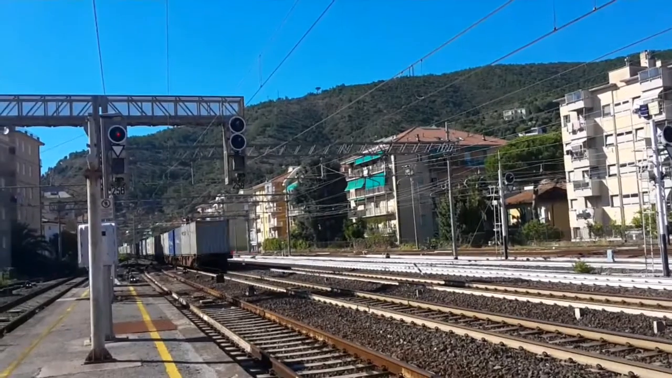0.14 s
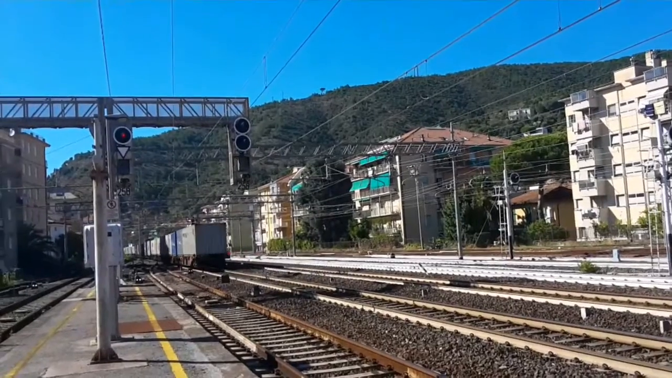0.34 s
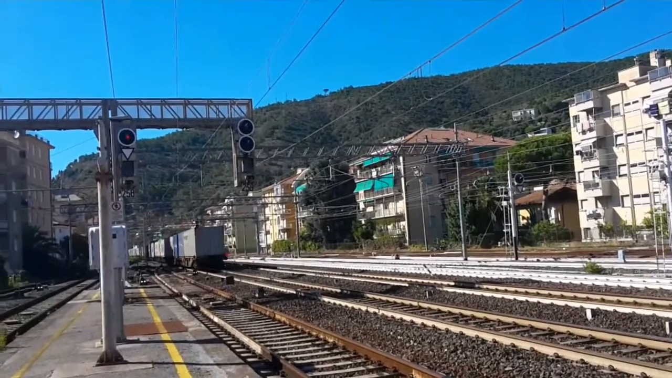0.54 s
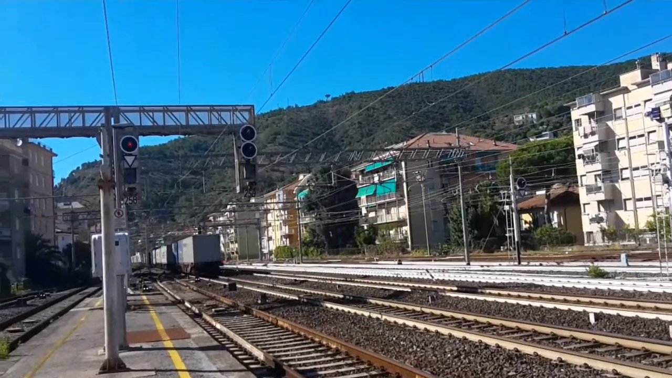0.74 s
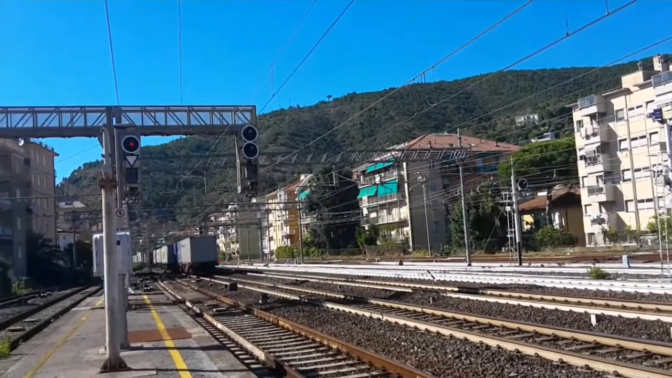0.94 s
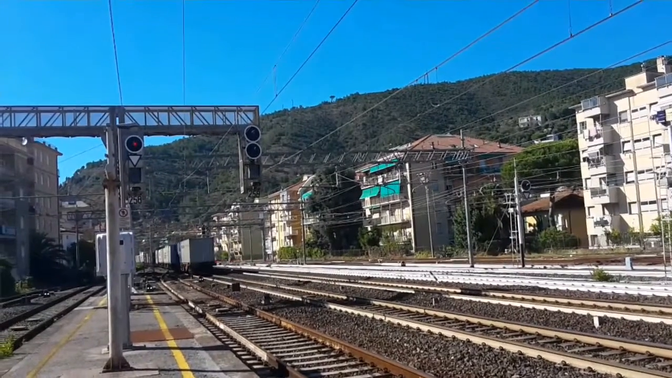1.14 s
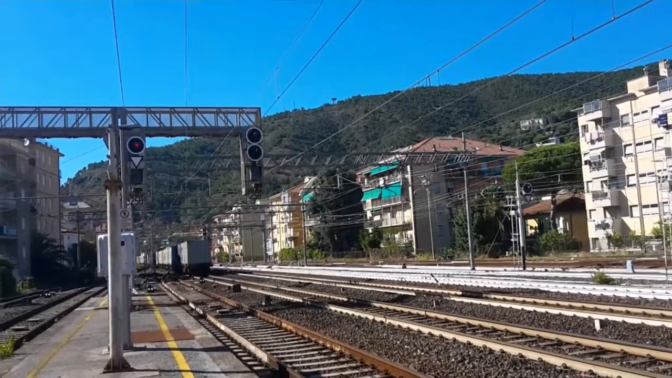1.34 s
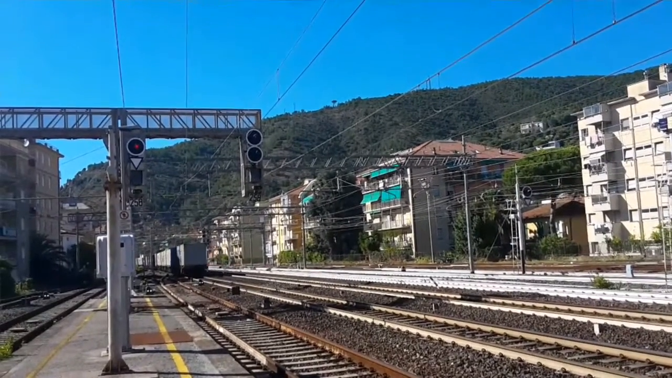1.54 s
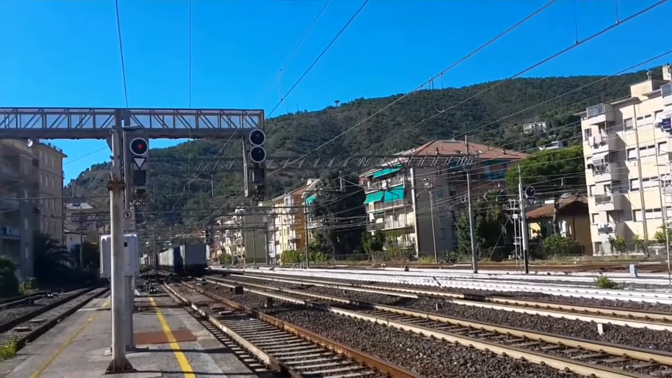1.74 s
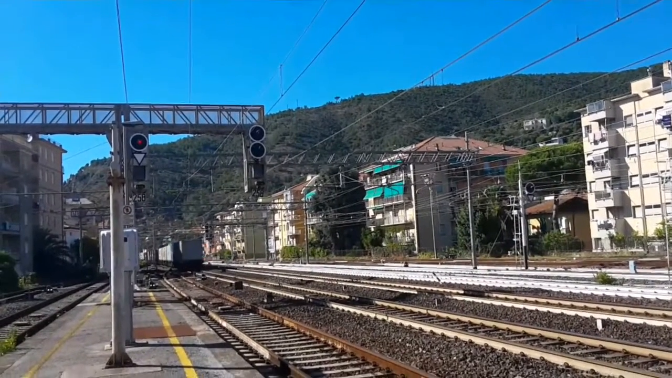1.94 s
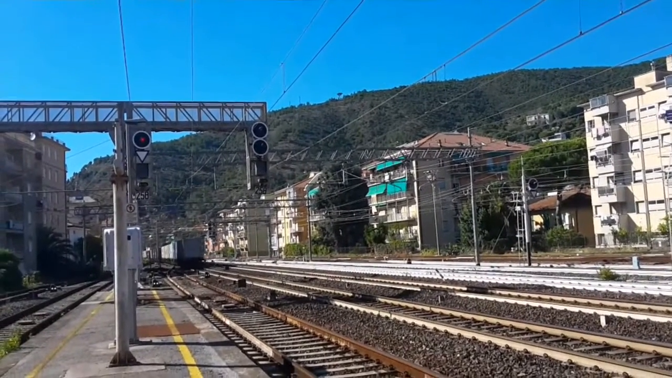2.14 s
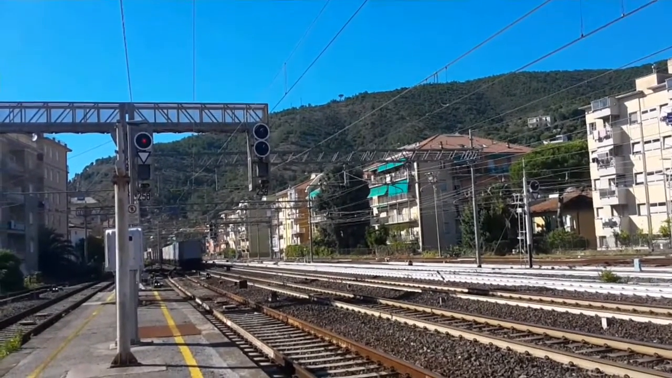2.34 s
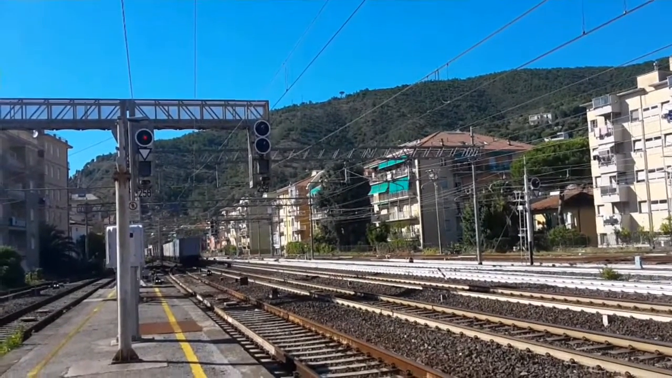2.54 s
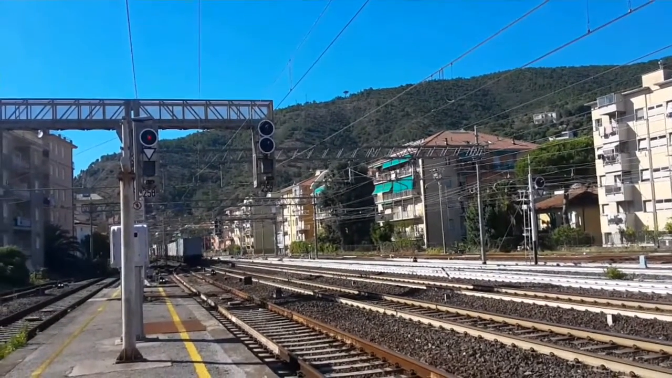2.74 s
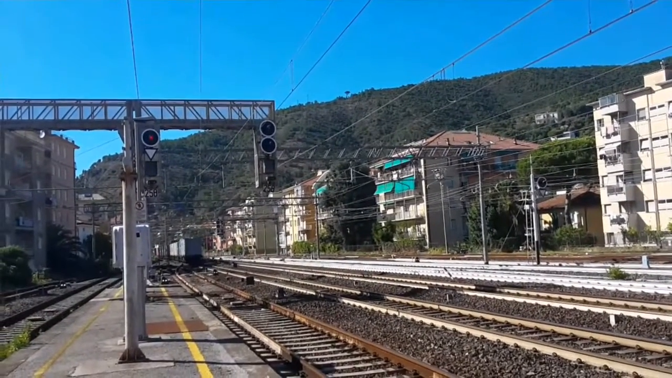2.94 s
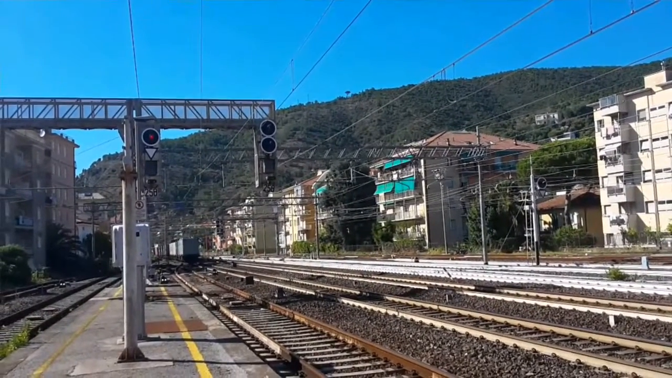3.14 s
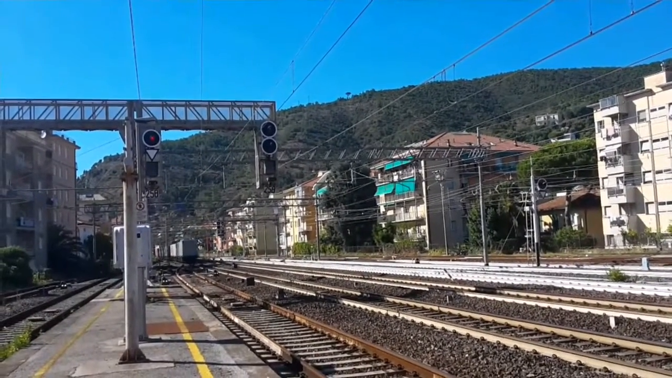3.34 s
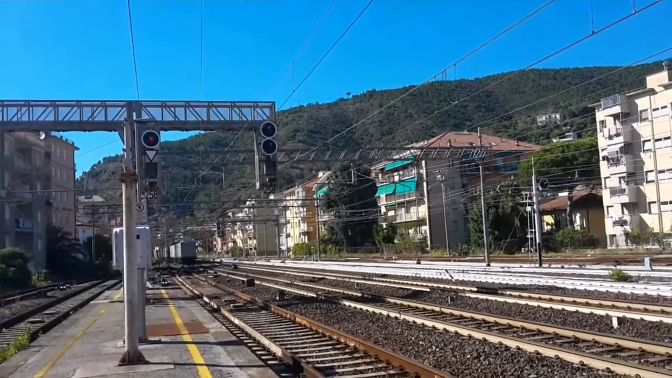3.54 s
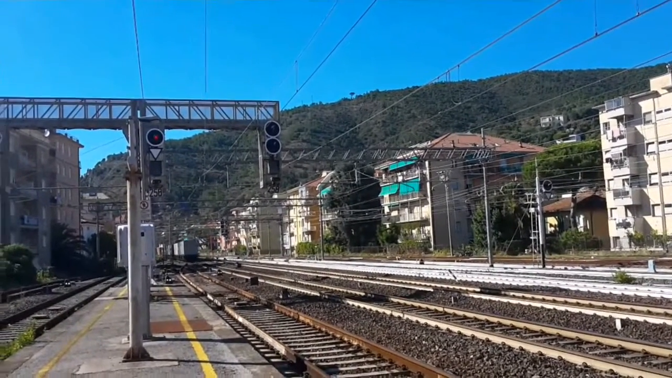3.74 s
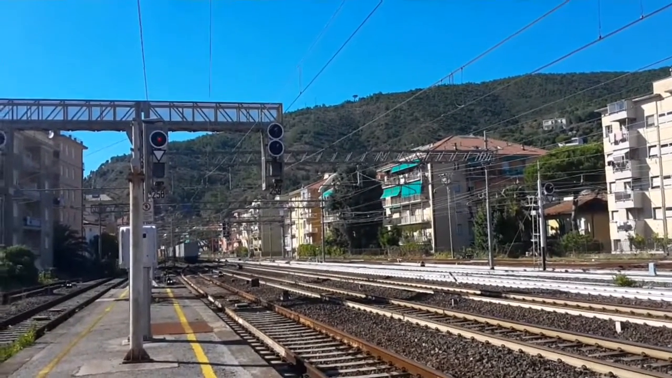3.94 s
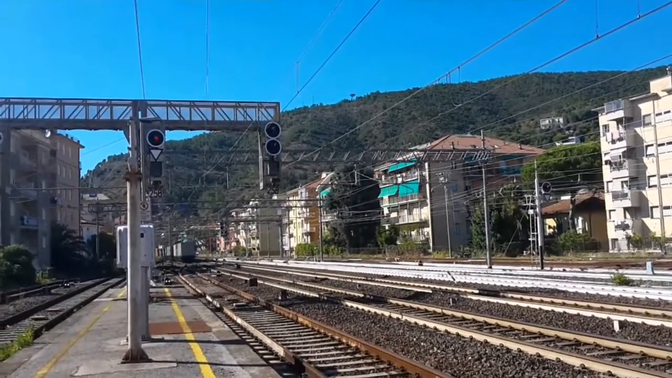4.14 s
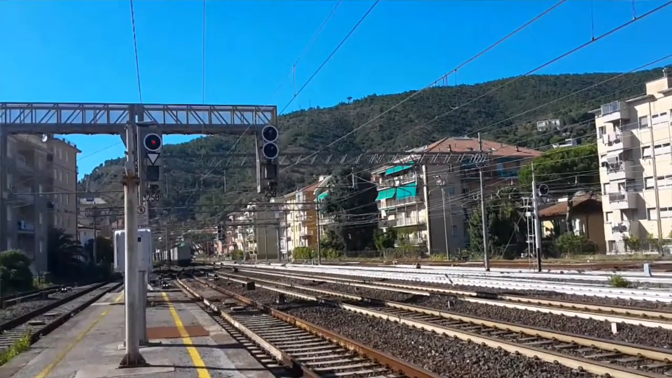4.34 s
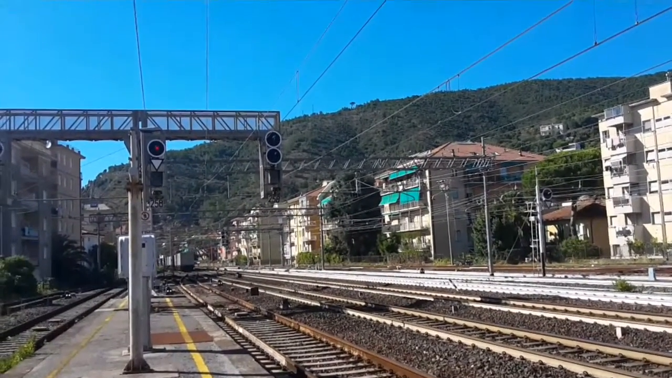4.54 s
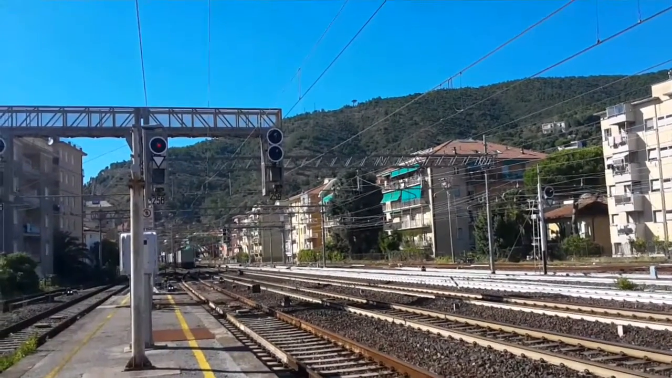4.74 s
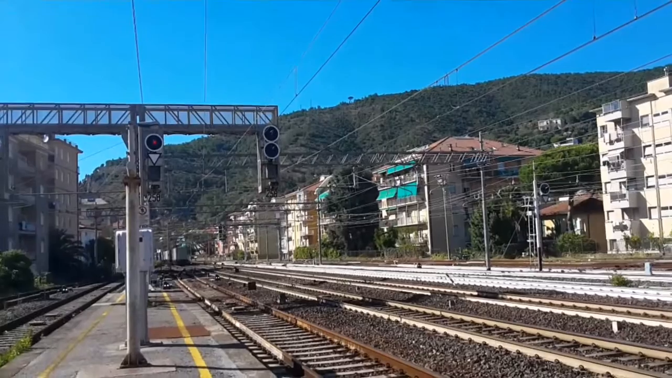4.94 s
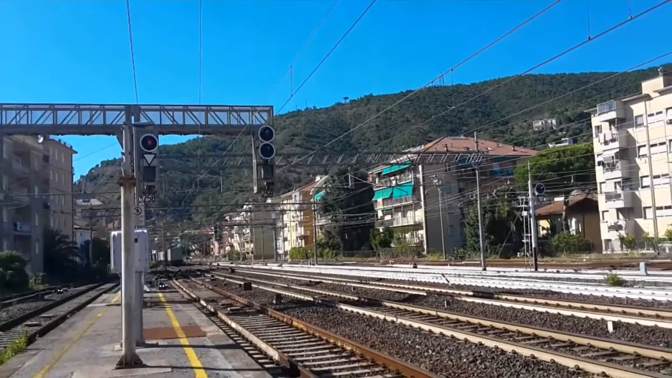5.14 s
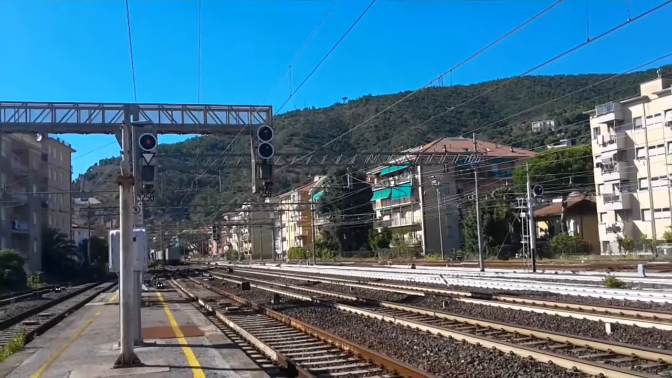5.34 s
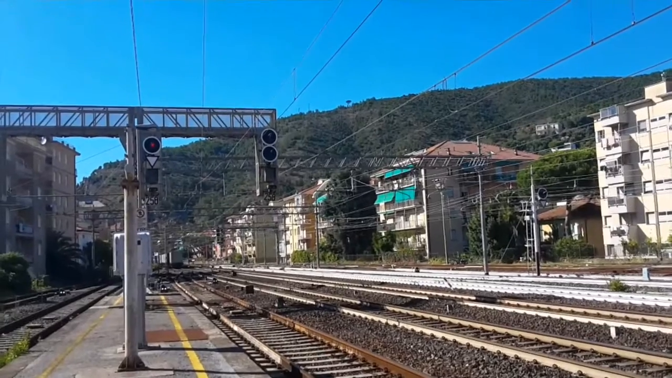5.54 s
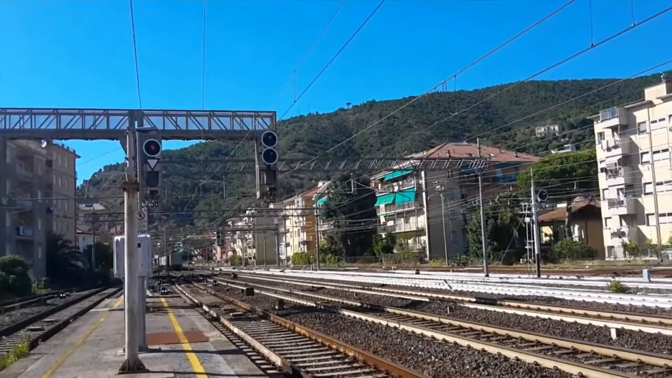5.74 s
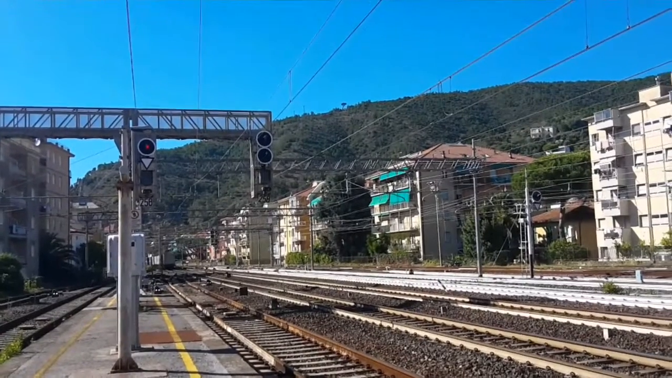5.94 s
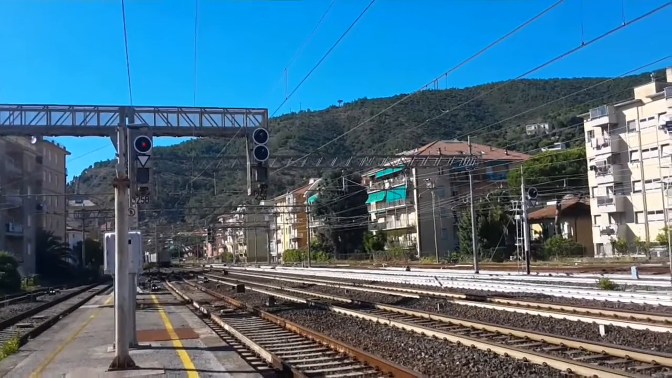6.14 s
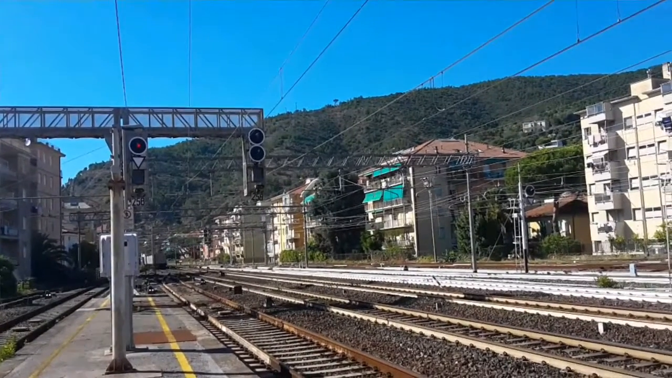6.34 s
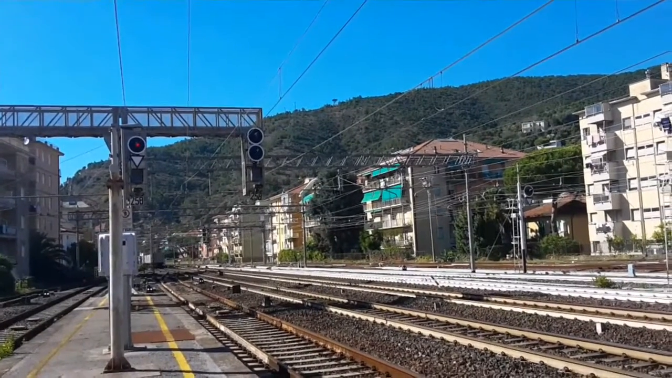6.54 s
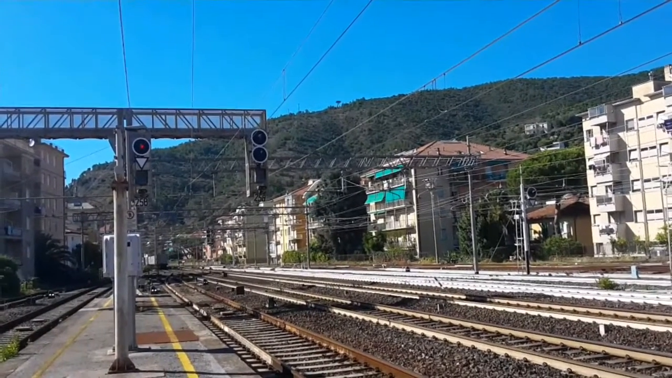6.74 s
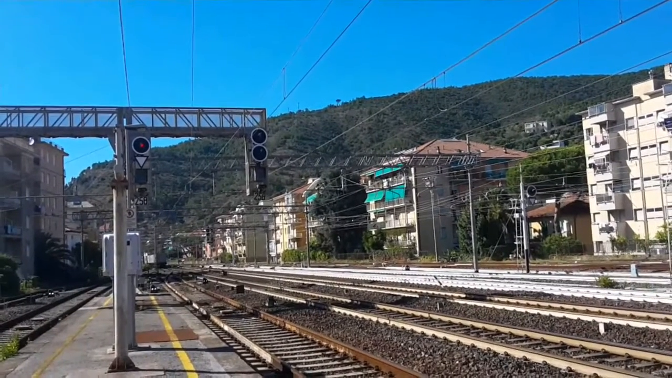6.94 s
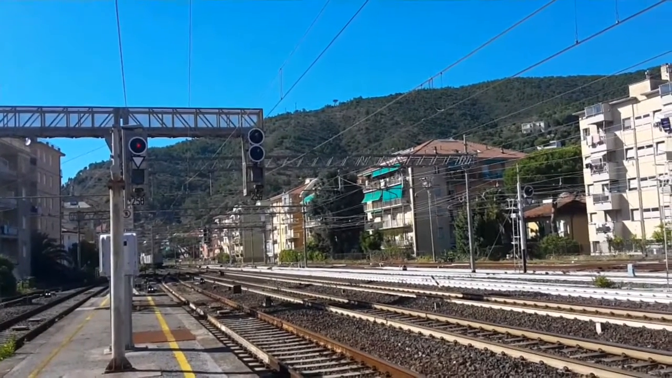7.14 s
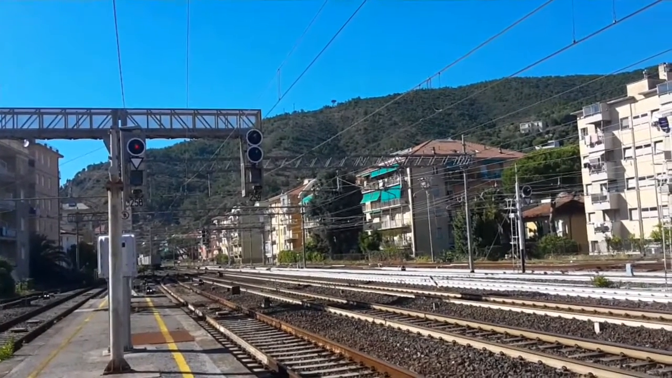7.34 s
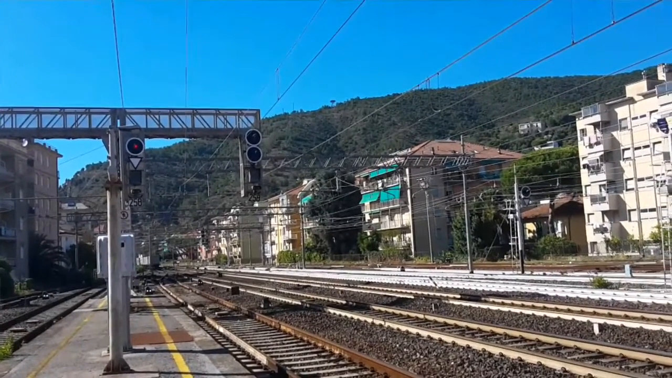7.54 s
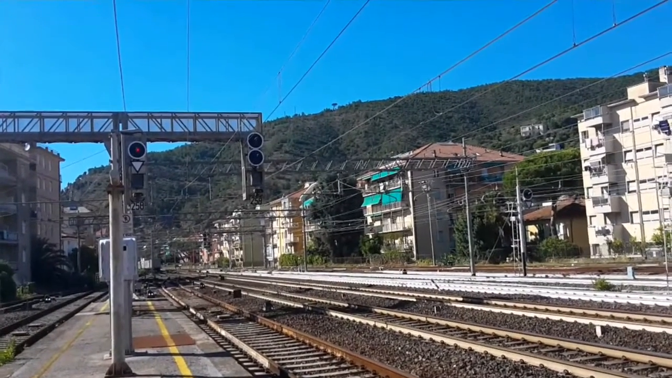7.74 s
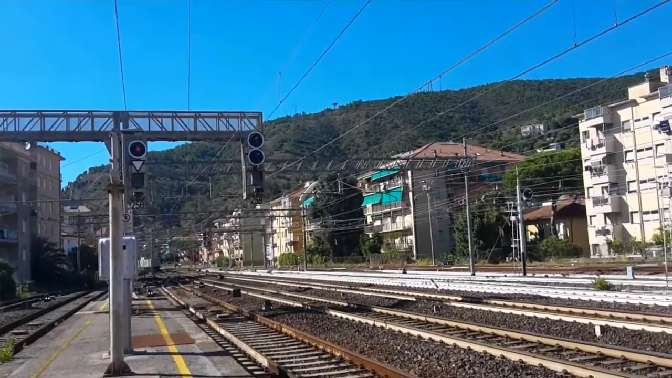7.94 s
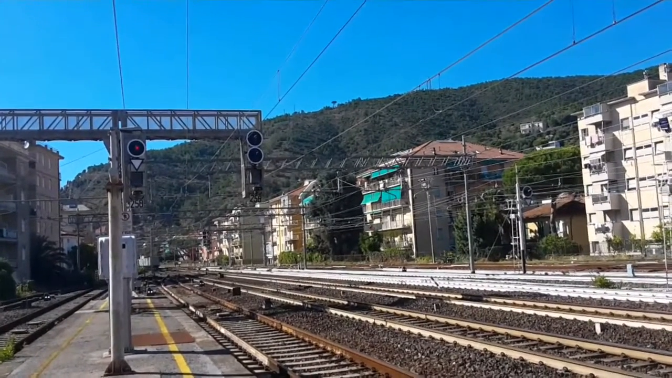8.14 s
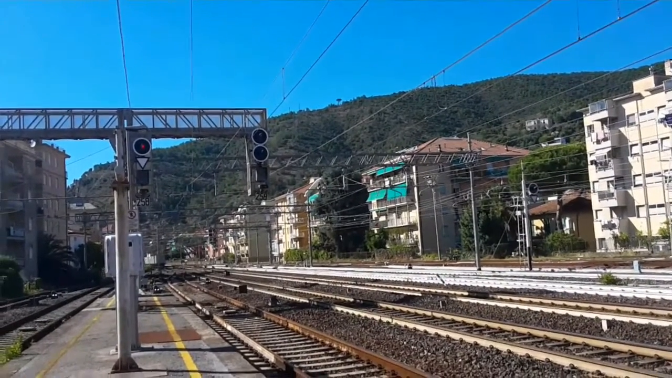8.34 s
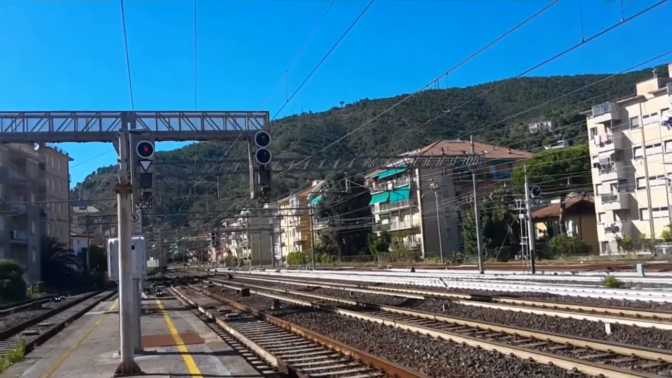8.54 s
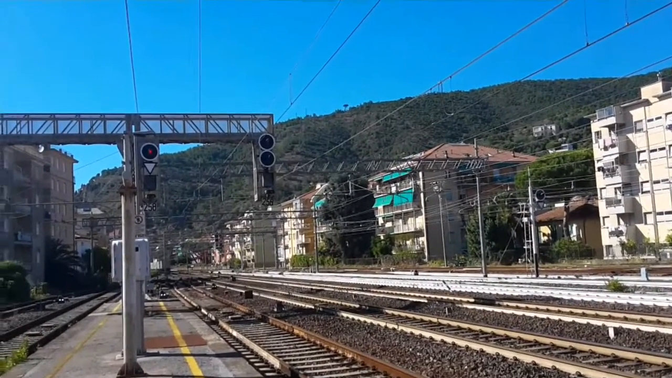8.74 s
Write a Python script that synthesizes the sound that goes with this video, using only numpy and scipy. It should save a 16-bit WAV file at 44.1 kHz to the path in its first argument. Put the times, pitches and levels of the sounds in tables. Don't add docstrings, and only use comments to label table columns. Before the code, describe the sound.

A freight train rumbles and clatters away from a station platform, axles knocking over points, one thin metal squeak, then fading into the distance.

```python
import sys
import numpy as np
from scipy import signal
from scipy.fft import rfft, irfft, next_fast_len
from scipy.io import wavfile
from scipy.ndimage import uniform_filter1d, map_coordinates

SR = 44100
rng = np.random.default_rng(int(sys.argv[2]) if len(sys.argv) > 2 else 0)


def to_wav(sig):
    pcm = np.clip(np.atleast_2d(sig), -1, 1) * 32767
    pcm = np.round(pcm).astype(np.int16)
    wavfile.write(sys.argv[1], SR, pcm.T)


def elevation(decibels):
    levels = np.asarray(decibels, float)
    return 10 ** (levels / 20)


N = 388521
T = np.arange(N) / SR
HZ = np.fft.rfftfreq(next_fast_len(N + 8192), 1 / SR)
KNOTS = np.arange(0, N + 256, 256) / SR

# frequency in Hz, level in dB.
HISS = [(300, -80.5), (2500, -89.5), (4500, -93.5), (5500, -116), (7500, -116), (9000, -112), (10000, -104),
        (13000, -99), (15600, -102)]
# frequency in Hz, level in dB.
QUIET = [(4500, -125), (5300, -103), (5800, -92), (6150, -98), (6500, -107), (7500, -108), (9400, -101),
         (11000, -99), (13000, -99.5), (15600, -99)]

# frequency in Hz, level in dB per Hz.
WIND_COLOUR = [(20, -16.5), (50, -5.5), (80, -2), (115, -1), (170, -6.5), (300, -27.5), (600, -120)]
# time in seconds, rise in dB, half length in seconds.
GUSTS = [
    (2.2, 6, .12),
    (2.83, 5, .05),
    (3.65, 4, .1),
    (4.05, 7.5, .12),
    (4.92, 7, .05),
    (5.84, 13.5, .07),
    (8.4, 6.5, .08),
]
# time in seconds, peak in dB, frequency in Hz.
WIND_POPS = [(2.461, -42, 123), (2.796, -47, 101), (2.837, -38, 104), (3.972, -44, 106), (4.071, -44, 116),
             (4.115, -47, 106), (4.138, -39, 113), (4.911, -41, 106), (5.794, -47, 88), (5.82, -43, 115),
             (5.85, -45, 113), (5.992, -42, 114)]
CALM_DB, OPEN_PORT_DB = -65, 16

# frequency in Hz, level in dB rms.
SQUEAK_MODES = [(12737, -86), (12915, -78), (13404, -82.5), (13722, -77), (13781, -82), (13851, -87),
                (13948, -82), (14018, -73.5), (14363, -85), (14508, -83.5), (14842, -75), (15068, -98.5),
                (15197, -96), (15660, -91.5)]
# frequency in Hz, level in dB per Hz.
SQUEAK_FIZZ = [(12300, -61), (12800, 0.5), (13250, -12), (13900, 2.5), (14200, -8), (14600, -3.5),
               (15200, -6), (15700, -9.5)]
SQUEAK_S, SQUEAK_DB, SQUEAK_HOLD_S = 1.26, -60.5, .15
SQUEAK_RISE, SQUEAK_FALL = 560, 68

# time in
# seconds, peak in dB, frequency in Hz, length in seconds.
KNOCKS = [(.42, -20, 183, 0.008), (0.507, -22, 1366, 0.013), (.52, -27, 827, 0.031),
          (0.525, -22, 645, 0.0087), (.582, -26, 517, .01), (0.604, -16, 1250, 0.0082),
          (0.616, -17.5, 648, 0.0093), (.626, -15, 470, 0.011), (0.699, -25, 1305, .008),
          (.745, -23, 465, 0.0099), (0.829, -20, 280, 0.0057), (.535, -21, 488, 0.015),
          (1.23, -21.5, 470, 0.015), (2.11, -18.5, 170, 0.0066), (2.182, -23, 250, 0.011),
          (2.22, -25.5, 140, 0.017), (2.241, -31.5, 45, 0.03), (2.2, -29, 105, .025), (4.919, -33, 95, .02),
          (7.12, -78, 9330, 0.035), (2.272, -24, 300, 0.02), (2.803, -27, 64.5, 0.013),
          (2.84, -33, 99, 0.022), (5.829, -33, 70, 0.021)]

# low edge in Hz, high edge in Hz.
PART_BANDS = [
    (30, 140),
    (140, 370),
    (370, 700),
    (700, 1600),
    (1600, 7000),
]
# level at the start in dB, fade in dB per s, extra while near in dB,
# time it stays near in seconds, unsteadiness in dB.
RETREAT = [
    (-50.5, .75, 7.5, 2.8, 2.1),
    (-36, 1.04, 1.7, .5, 0.73),
    (-38, 1.54, 1.5, .6, 0.46),
    (-37.5, 1.5, 1.5, .6, 0.52),
    (-37.5, 1.7, 0.5, 0.45, 0.4),
]
# time in seconds, rise in dB, half length in seconds.
RUBS = [(.05, 1.5, .05), (.5, -0.5, 0.034), (.73, 1.5, 0.042), (2.36, 3, 0.2), (3.09, 3, .15),
        (4.08, 1, 0.26), (5.7, 0.2, 0.074), (6.2, 1, 0.11), (7.02, 2.5, 0.21), (7.87, 4, 0.19)]
RUB_SHARE = [0.079, .1, 0.16, 0.14, 0.91]
# time in seconds, rise in dB, half length in seconds.
JOLTS = [(.62, 2.5, .09), (1.55, 0.2, .05), (2.1, 2.5, 0.083), (2.95, 1, 0.1), (4.1, 1.5, .1),
         (5.4, -0.2, 0.17), (6.2, 1.5, 0.35), (6.9, 1, .08)]
JOLT_SHARE = [1.2, 1.1, 0.66, 0.34, 0.08]
# frequency in Hz, width in Hz, level in dB.
STEEL = [(70, 90, -4.5), (211, 150, -6), (330, 85, -6), (470, 120, -4.5), (610, 100, -27.5),
         (873, 120, -10), (1047, 160, -5), (1285, 160, -2), (1912, 210, -9), (2150, 230, -11),
         (2598, 290, -6), (3285, 248, -3.5), (4198, 300, -9)]
# frequency in Hz, gain in dB.
AIR = [(20, -12.5), (40, 7), (3400, -2.5), (4400, -6), (5000, -7), (5600, -10), (6350, -24), (6550, -47),
       (7000, -120)]
# frequency in Hz, change in dB per s.
FAR = [(100, 0.5), (4000, -0.5), (5000, -1), (6000, -4)]
# frequency in Hz, width in Hz, change in dB per s.
GROUND_DIP = (686, 95, -0.79)

# frequency in Hz, gain in dB.
COVER = [(45, -28.5), (100, -27), (200, -29), (470, -25.5), (720, -23.5), (1150, -19.5), (1750, -24),
         (2050, -28), (2550, -22.5), (3250, -37), (3650, -23), (4050, -27.5), (4400, -12), (4900, -8.5),
         (5600, -13)]
# frequency in Hz, likeness 0-1, phase lead of the right port in rad.
SHARED = [(90, .2, .4), (200, .85, .4), (470, .95, .45), (720, .45, .6), (1150, .9, .2), (1400, .55, -.1),
          (1750, .65, -.55), (2000, .1, -1), (2550, .65, -1.2), (3100, .15, -2), (3450, .55, -1.3),
          (4050, .15, -1), (4300, .7, -.8), (4700, .25, -2.6)]


def unit(x):
    return x / np.sqrt(np.mean(x ** 2) + 1e-20)


def along(points, hz, axis=1):
    rows = np.transpose(points)
    return np.interp(np.log(hz + 1), np.log(rows[0] + 1), rows[axis])


def filtered(x, response):
    size = 2 * len(HZ) - 2
    return irfft(rfft(x, size) * response, size)[..., :N]


def noise(patchy_db):
    z = signal.stft(rng.standard_normal(N), nperseg=512)[2]
    patches = uniform_filter1d(rng.standard_normal(z.shape), size=5, axis=0)
    patches = uniform_filter1d(patches, size=12, axis=1)
    return signal.istft(z * elevation(patchy_db * unit(patches)), nperseg=512)[1][:N]


def bump(s, db, hz, length, phase):
    out = np.zeros(N)
    near = slice(round((s - 5 * length) * SR), round((s + 5 * length) * SR))
    t = T[near] - s
    out[near] = elevation(db) * np.exp(-.5 * (t / length) ** 2) * np.cos(2 * np.pi * hz * t - phase)
    return out


def swells(rows):
    humps = sum(db * np.exp(-.5 * ((KNOTS - s) / length) ** 2) for s, db, length in rows)
    return np.interp(T, KNOTS, humps)


def drift(rate):
    return np.interp(T, KNOTS, map_coordinates(rng.standard_normal(200), [KNOTS * rate]))


def hiss():
    return filtered(rng.standard_normal((2, N)), elevation(along(HISS, HZ) + 32))


def wind():
    air = unit(filtered(rng.standard_normal((2, N)), elevation(along(WIND_COLOUR, HZ))))
    pops = sum(bump(s, db, hz, 0.44 / hz, 0) for s, db, hz in WIND_POPS)
    breeze = elevation(CALM_DB + swells(GUSTS))
    gusts_only = breeze - elevation(CALM_DB)
    return np.array([air[0] * elevation(OPEN_PORT_DB) * gusts_only, air[1] * breeze + pops])


def squeak():
    rise_db = SQUEAK_RISE * np.maximum(SQUEAK_S - T, 0)
    fall_db = SQUEAK_FALL * np.maximum(T - SQUEAK_S - SQUEAK_HOLD_S, 0)
    power = sum(elevation(2 * db) / (1 + ((HZ - hz) / 9) ** 2) for hz, db in SQUEAK_MODES)
    modes = unit(filtered(rng.standard_normal(N), np.sqrt(power)))
    fizz = unit(filtered(noise(patchy_db=4), elevation(along(SQUEAK_FIZZ, HZ))))
    return elevation(SQUEAK_DB - rise_db - fall_db) * (.7 * modes + .7 * fizz)


def knocks():
    return sum(bump(s, db, hz, length / 2, np.pi / 2) for s, db, hz, length in KNOCKS)


def part_levels():
    rubs, jolts = swells(RUBS), swells(JOLTS)
    levels = []
    for row, rub, jolt in zip(RETREAT, RUB_SHARE, JOLT_SHARE):
        start_db, fade_db, near_db, near_s, loose_db = row
        retreat = start_db - fade_db * T + near_db * np.exp(-(T / near_s) ** 2)
        levels.append(retreat + rub * rubs + jolt * jolts + loose_db * drift(rate=6))
    return levels


def below(hz):
    return 1 / (1 + (HZ / hz) ** 8)


def rolling(levels):
    power = sum(elevation(2 * db) * (HZ * width) ** 2 / ((hz * hz - HZ ** 2) ** 2 + (HZ * width) ** 2)
                for hz, width, db in STEEL)
    roar = filtered(noise(patchy_db=0.46), np.sqrt(power) * elevation(along(AIR, HZ)))
    dip_hz, dip_width, dip_db = GROUND_DIP
    loss_db = along(FAR, HZ) + dip_db * np.exp(-((HZ - dip_hz) / dip_width) ** 2)
    late = filtered(roar, elevation(loss_db * T[-1]))
    far = np.clip((-37 - levels[-1]) / 17, 0, 1)
    roar += (late - roar) * far ** 0.46
    return sum(elevation(db + 5.5) * unit(filtered(roar, below(high) - below(low)))
               for db, (low, high) in zip(levels, PART_BANDS))


def scene():
    levels = part_levels()
    train = rolling(levels) + knocks()
    alike = along(SHARED, HZ)
    muffle = elevation(along(COVER, HZ))
    right = filtered(train, muffle * alike * np.exp(1j * along(SHARED, HZ, axis=2)))
    right += filtered(rolling(levels), muffle * np.sqrt(1 - alike ** 2))
    squeak_gain = elevation(np.array([[0], [-21]]))
    return np.array([train, right]) + wind() + squeak() * squeak_gain


def gate(x, follow, flicker_db, size=11):
    hz, _, z = signal.stft(x, SR, nperseg=2048)
    power = np.abs(z) ** 2
    band = np.add.reduceat(power, np.arange(0, len(hz), size), axis=1) / size
    band = np.repeat(band, size, axis=1)[:, :len(hz)]
    loud_db = 10 * np.log10(uniform_filter1d(power.sum(axis=1), size=5, axis=1) + 1e-12) + 40
    shift_db = follow * loud_db + flicker_db * rng.standard_normal(loud_db.shape)
    threshold_db = along(QUIET, hz)[:, None] + shift_db[:, None]
    return signal.istft(z * (band > elevation(2 * threshold_db)), SR, nperseg=2048)[1][:, :N]


def top_cut(x):
    return signal.sosfilt(signal.butter(12, 15720, fs=SR, output="sos"), x)


def record(dry):
    mix = gate(dry + hiss() - .00055, follow=.4, flicker_db=1.5)
    return top_cut(mix)


dry = scene()
out = record(dry)
to_wav(out)
```